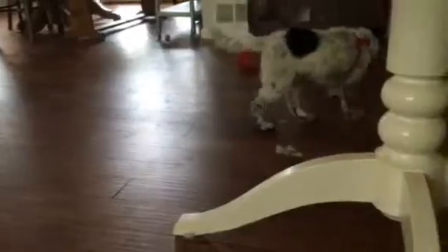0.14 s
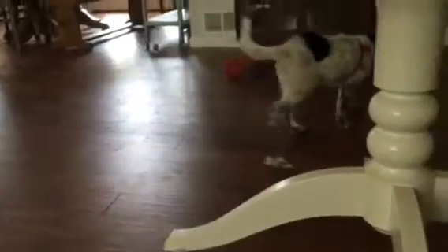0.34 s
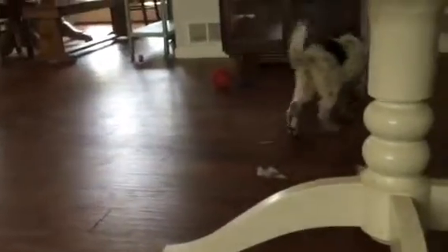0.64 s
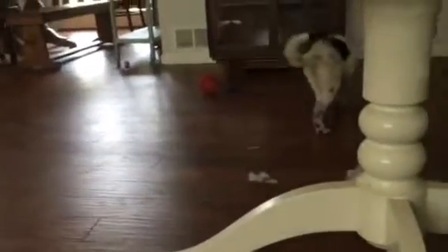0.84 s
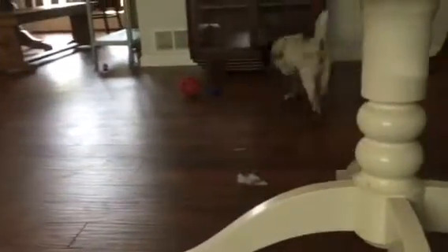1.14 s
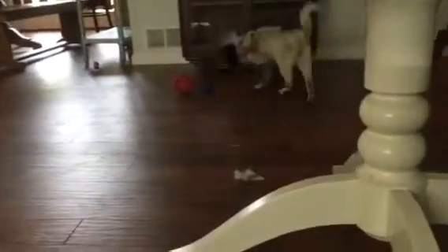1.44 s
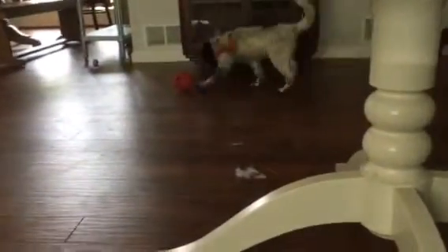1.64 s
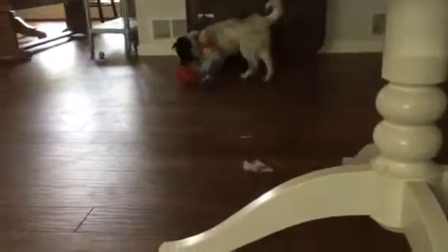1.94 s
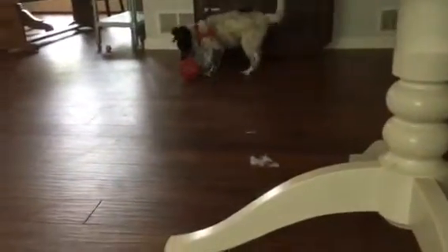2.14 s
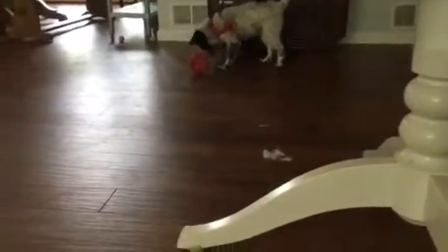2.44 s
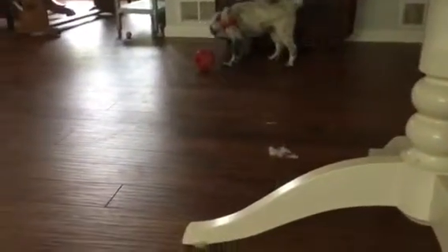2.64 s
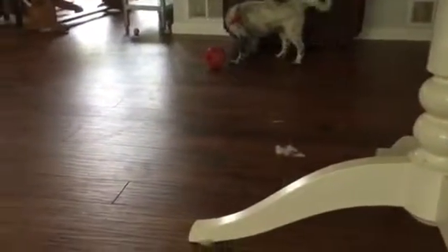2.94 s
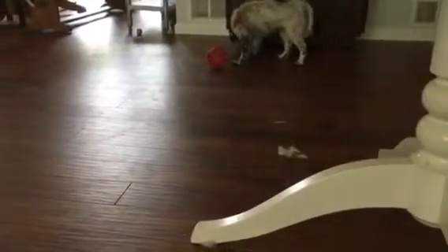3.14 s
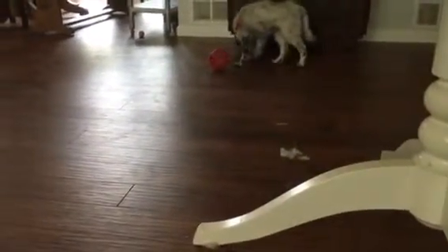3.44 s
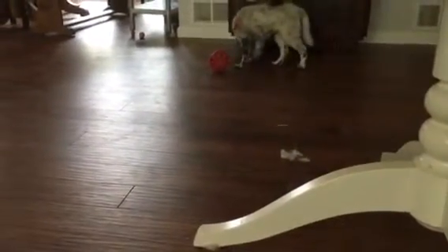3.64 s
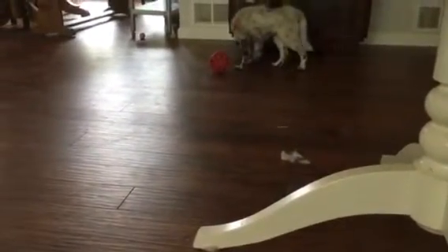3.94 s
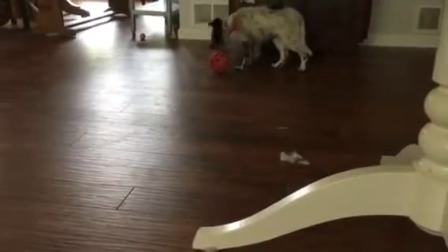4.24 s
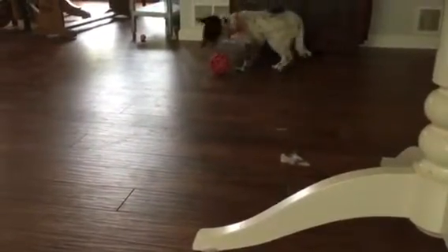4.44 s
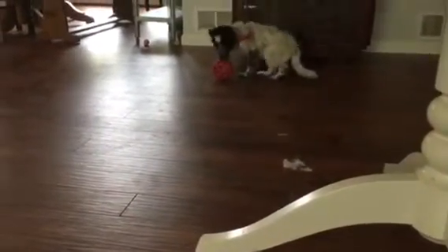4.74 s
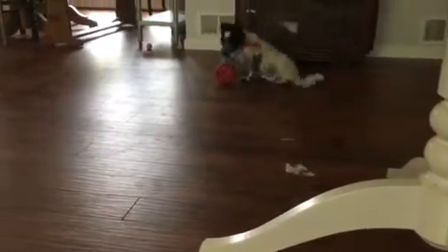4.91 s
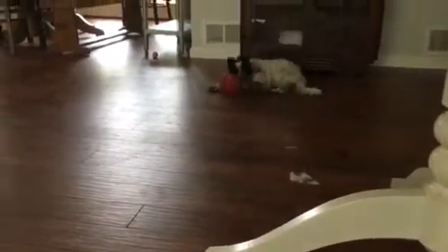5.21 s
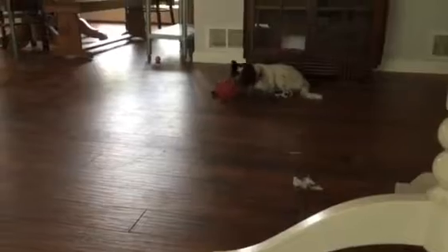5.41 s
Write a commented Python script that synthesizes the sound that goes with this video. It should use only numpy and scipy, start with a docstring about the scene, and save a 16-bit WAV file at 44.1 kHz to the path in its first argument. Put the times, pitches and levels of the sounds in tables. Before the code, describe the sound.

A puppy trots over hardwood with faint claw ticks and soft paw thuds, then bats a hard hollow plastic toy, which cracks and clatters loudly around two seconds. A quieter stretch has tiny nips and rubs. It skids a nail, flops down and knocks the toy again. Bare, reverberant room; microphone some distance away, with low air noise and hum.

```python
"""Soft air noise and a faint rumble last throughout, with an appliance hum that rises over 2.2 s (noise, sine).
A puppy trots over hardwood: claws tick (short noise bursts), paws thud (damped floor and plank modes).
It paws at a hard, hollow plastic toy, which scrapes (random jolts) and clatters (cracks, shell resonances).
It nuzzles and nips the toy, skids a nail and flops down on it; decaying noise gives the bare room's echoes."""
import sys
import numpy as np
from scipy import signal
from scipy.fft import rfft, irfft, next_fast_len
from scipy.io import wavfile
from scipy.ndimage import map_coordinates

SR = 44100
rng = np.random.default_rng(int(sys.argv[2]) if len(sys.argv) > 2 else 0)


def persist_wave(psi):
    """Save psi, clipped to +-1, as 16-bit WAV."""
    counts = np.round(np.clip(psi, -1, 1) * 32767).astype(np.int16)
    wavfile.write(sys.argv[1], SR, np.atleast_2d(counts).T)


N = 245637
T = np.arange(int(0.6 * SR)) / SR  # s, one event
CLOCK = np.arange(N) / SR  # s, whole scene


def amp(db):
    """Decibels to amplitude gain."""
    return 10 ** (np.asarray(db) / 20)


def fade(t60_s):
    """Exponential decay: 60 dB lost in t60_s."""
    return np.exp(-np.log(1000) * T / t60_s)


def unit(x, size=None):
    """x scaled to rms 1 over its first size samples."""
    return x / np.sqrt(np.mean(x[:size] ** 2) + 1e-20)


def crest(x):
    """x scaled to peak 1."""
    return x / np.abs(x).max()


def along(points, hz):
    """(f/Hz, value) points interpolated on a log-frequency axis."""
    f, v = np.transpose(points)
    return np.interp(np.log(hz + 1), np.log(f + 1), v)


def wobble(rate_hz, size=N):
    """Smooth random curve with rate_hz knots a second."""
    knots = rng.standard_normal(int(size * rate_hz / SR) + 4)
    return map_coordinates(knots, [CLOCK[:size] * rate_hz])


def colour(x, spectrum, size=2048):
    """x through a minimum-phase filter with the given (f/Hz, gain/dB)."""
    gain_db = along(spectrum, np.fft.rfftfreq(size, 1 / SR))
    cepstrum = irfft(np.log(amp(gain_db)))
    cepstrum[1:size // 2] *= 2  # fold to make it causal
    cepstrum[size // 2 + 1:] = 0
    impulse = irfft(np.exp(rfft(cepstrum)))
    return signal.fftconvolve(x, impulse)[:len(x)]


def resonate(x, peaks):
    """x through parallel damped resonances (f/Hz, width/Hz, level/dB), at random phases."""
    t = T[:4096]
    impulse = np.zeros(len(t))
    for hz, width_hz, db in peaks:
        decay = np.exp(-np.pi * width_hz * t)
        impulse += amp(db) * width_hz * decay * np.sin(2 * np.pi * (hz * t + rng.random()))
    return signal.fftconvolve(x, impulse)[:len(x)]


def ring(modes, scatter_db):
    """Damped modes (f/Hz, level/dB, t60/s), each struck at a random strength and phase."""
    gains = amp(rng.normal(0, scatter_db, len(modes)))
    out = np.zeros(len(T))
    for gain, (hz, db, t60_s) in zip(gains, modes):
        out += gain * amp(db) * fade(t60_s) * np.sin(2 * np.pi * (hz * T + rng.random()))
    return out


def add(track, s, sound):
    """Mix a sound into the track at s seconds."""
    room_left = track[max(round(s * SR), 0):][:len(sound)]
    room_left += sound[:len(room_left)]


def strokes(rows, attack_s, release_s, swell_db=0):
    """Gain of (t/s, length/s, level/dB) strokes: linear attack, swell to level, exponential release."""
    gain = np.zeros(N)
    for s, length_s, db in rows:
        t = CLOCK - s
        to_go = 1 - np.clip(t / length_s, 0, 1)
        attack = np.clip(t / attack_s, 0, 1)
        release = np.exp(-np.maximum(t - length_s, 0) / release_s)
        gain += amp(db - swell_db * to_go) * attack * release
    return gain


# Diffuse room decay: f/Hz, t60/s
ROOM_DECAY = [(150, 0.79), (700, 0.53), (2000, 0.72), (5000, 0.65), (9000, 0.48), (14000, 0.33)]


def echoes(early_db=2, early_t60=0.17, spiky=0.69):
    """Room answer: uneven, spiky early reflections plus a diffuse tail whose top treble dies soonest."""
    hz, t, z = signal.stft(rng.standard_normal(len(T)), SR, nperseg=256)
    decay = np.exp(-np.log(1000) * t / along(ROOM_DECAY, hz)[:, None])
    tail = signal.istft(z * decay, SR, nperseg=256)[1][:len(T)]
    spikes = rng.standard_normal(len(T)) * np.exp(spiky * rng.standard_normal(len(T)))
    return tail + amp(early_db) * unit(spikes) * fade(early_t60)


def crack(spectrum, t60):
    """Direct sound of a hard contact: impulse plus decaying noise, filtered, peak 1."""
    burst = 0.89 * rng.standard_normal(len(T)) * fade(t60)
    return crest(colour((T == 0) + burst, spectrum))


# Knock tone bands: lower f/Hz, upper f/Hz
TONE_BANDS = [(400, 1500), (1500, 4500), (4500, 7000), (7000, 9800), (9800, 15900)]


def balance(x, levels_db, size=1024):
    """(f/Hz, gain/dB) filter points that steer the start of x to the given band levels."""
    hz = np.fft.rfftfreq(size, 1 / SR)
    power = 2 * np.abs(rfft(x[:size]) / size) ** 2
    points = []
    for (lo, hi), db in zip(TONE_BANDS, levels_db):
        change_db = db - 10 * np.log10(power[(hz >= lo) & (hz < hi)].sum())
        points += [(lo * 1.1, change_db), (hi / 1.1, change_db)]
    return points


AIR_DB = -62  # mean level, rms
HUM_DB, HUM_RISE_S = -63.5, 2.2  # rms level once risen; linear rise
# Air noise spectrum: f/Hz, level/dB
AIR_SPECTRUM = [(59, -33), (100, -7.5), (210, -4.5), (238, -1), (265, -6.5), (301, -1), (405, -11.5),
                (469, -13), (687, -14), (849, -15.5), (1100, -17), (1440, -13.5), (4930, -32),
                (6220, -33.5), (15800, -43.5)]


def background(rumble_db=-68, hum_hz=59.0):
    """Filtered air noise and rumble, plus a sine hum wavering in phase and level."""
    air = unit(colour(rng.standard_normal(N), AIR_SPECTRUM, size=8192))
    air = air * amp(AIR_DB + 0.36 * wobble(9.8))
    rumble_spectrum = [(20, -24.5), (42, -12), (65, 1), (110, -6.0), (200, -36.5), (800, -67.5)]
    rumble = unit(colour(rng.standard_normal(N), rumble_spectrum, size=8192))
    hum = np.sqrt(2) * np.sin(2 * np.pi * hum_hz * CLOCK + 0.34 * wobble(2.7))
    hum *= np.minimum(CLOCK / HUM_RISE_S, 1)
    return air + amp(rumble_db) * rumble + hum * amp(HUM_DB + 1.4 * wobble(7.7))


# Small dry tap at the microphone: t/s, click peak level/dB
MIC_TAPS = [(3.062, -38.5)]


def taps(bump_db=-9, bump_hz=130):
    """A click too close to echo, with a small, decaying low bump."""
    out = np.zeros(N)
    spectrum = [(200, -5), (1600, 4.5), (3200, -5.5), (5000, -1), (9000, -18), (15000, -21)]
    for s, db in MIC_TAPS:
        click = crack(spectrum, t60=0.0015)
        bump = fade(0.048) * np.sin(2 * np.pi * bump_hz * T)
        add(out, s, amp(db) * (click + amp(bump_db) * bump))
    return out


# Paw skims the boards: t/s, length/s, level/dB
PAW_SWISHES = [(0.165, .05, -68)]


def swish(attack_s=0.025, release_s=0.099):
    """A dry pad brushes the varnish: a thin noise hiss."""
    spectrum = [(1000, -6), (4000, 5), (9000, -1.5), (15800, -7)]
    hiss = unit(colour(rng.standard_normal(N), spectrum))
    return hiss * strokes(PAW_SWISHES, attack_s, release_s)


# Nail catches and skids as the puppy crouches: t/s, level/dB
NAIL_SKIDS = [(4.479, -63.5), (4.493, -60)]
# Skid resonances: f/Hz, width/Hz, level/dB
SKID_MODES = [(3640, 580, 1), (5440, 1100, -5), (6800, 1100, -8.5), (8580, 510, -11), (11000, 2100, -21)]


def skids(early_db=5, early_t60=0.077):
    """A skidding nail excites damped resonances: a short, ringing scuff."""
    out = np.zeros(N)
    for s, db in NAIL_SKIDS:
        scuff = unit(resonate(echoes(early_db, early_t60), SKID_MODES), size=1000)
        add(out, s, amp(db) * scuff)
    return out


TROT_END_S = 1.6  # other nails graze the floor until then
GRAZE_TICK_DB, GRAZE_RING_DB = -56, -68.5  # before the trims
# Claws touch the boards: t/s, tick peak level/dB, ring level/dB (both before the trims)
CLAW_TICKS = [(0.064, -62, -62.5), (0.434, -45.5, -71), (0.579, -60, -67), (0.752, -47, -67),
              (0.778, -54, -58), (1.235, -63, -66.5), (1.397, -60, -64), (1.434, -46, -53),
              (3.349, -64, -71.5), (4.62, -55, -69)]
# Nail-on-board spectrum: f/Hz, level/dB
NAIL_SPECTRUM = [(500, -15.5), (1400, -5.5), (2400, -3), (3500, -1), (4800, -2.5), (6200, -2), (7600, -13),
                 (8700, -4.5), (10300, -17.5), (12000, -12.5), (15800, -24)]


def claws(ring_trim_db=-3, tick_trim_db=-4, count=9):
    """Thin, bright nail ticks with room echoes, plus randomly timed grazes during the trot."""
    out = np.zeros(N)
    grazes = []
    for k in range(count):
        graze_s = TROT_END_S * (k + rng.random()) / count
        grazes.append((graze_s, GRAZE_TICK_DB, GRAZE_RING_DB))
    for s, tick_db, ring_db in CLAW_TICKS + grazes:
        answer = unit(colour(echoes(early_db=1.5, early_t60=0.076), NAIL_SPECTRUM), size=1000)
        tick = crack(NAIL_SPECTRUM, t60=0.006)
        add(out, s, amp(ring_db + ring_trim_db) * answer + amp(tick_db + tick_trim_db) * tick)
    return out


# Paws, body and toy load the floor: t/s, deep thud level/dB, plank knock level/dB (before the trims)
FLOOR_THUDS = [(0.096, -47, -52.5), (0.463, -50, -62), (0.806, -39, -54), (0.844, -40.5, -56),
               (1.124, -43.5, -56), (1.447, -37, -42), (1.488, -45, -56), (1.811, -46, -35),
               (1.886, -36, -59), (1.946, -40, -45), (2.015, -41, -39.5), (2.555, -60, -40.5),
               (5.07, -36.5, -41), (5.25, -35, -32), (5.31, -42, -45)]
# Deep floor bending modes: f/Hz, level/dB, t60/s
JOIST_MODES = [(62.4, -1, 0.16), (77.3, -3, 0.37), (103.5, -0.5, 0.24)]
# Single plank modes: f/Hz, level/dB, t60/s
PLANK_MODES = [(152.6, -1, 0.092), (213.3, 2.5, 0.13), (243.5, 1.5, 0.089), (312.4, -7, 0.127)]


def thuds(deep_trim_db=-2.0, plank_trim_db=1.0, room_db=-13):
    """Soft weight bends the whole floor; harder landings knock the planks, which the room echoes."""
    out = np.zeros(N)
    swell = 1 - np.exp(-(T / 0.008) ** 2)  # soft pads spread the blow over several ms
    boom_spectrum = [(70, -10.5), (220, -0.5), (330, -4.5), (450, -12.0), (1200, -58)]
    for s, deep_db, plank_db in FLOOR_THUDS:
        boom = crest(colour(echoes(), boom_spectrum))
        plank_ring = ring(PLANK_MODES, scatter_db=2.5) / len(PLANK_MODES)
        planks = crest(swell * (plank_ring + amp(room_db) * boom))
        joists = crest(swell * ring(JOIST_MODES, scatter_db=3.5))
        add(out, s, amp(deep_db + deep_trim_db) * joists + amp(plank_db + plank_trim_db) * planks)
    # the floor radiates little deep bass
    return signal.sosfilt(signal.butter(2, 45, 'highpass', fs=SR, output='sos'), out)


# Muzzle rubs on the toy: t/s, length/s, level/dB
MUZZLE_RUBS = [(3.35, 0.046, -66), (3.52, 0.13, -68.5), (3.77, 0.11, -66.5)]


def nuzzle(attack_s=0.028, release_s=0.046):
    """Nose and fur rub the hollow shell: noise through damped resonances."""
    peaks = [(1150, 510, -7), (1640, 65, -3.5), (1880, 110, -0.5), (2110, 160, -5.0)]
    rub = unit(resonate(rng.standard_normal(N), peaks))
    return rub * strokes(MUZZLE_RUBS, attack_s, release_s)


# Teeth nip the still toy: t/s, level/dB
TOOTH_NIPS = [(3.511, -67), (3.614, -61), (3.713, -61)]
# Nipped rim resonances: f/Hz, width/Hz, level/dB
RIM_MODES = [(1210, 880, -3.5), (1690, 170, 0), (2200, 150, 4.5), (2880, 510, -7.5), (3690, 280, 1),
             (6100, 1100, -16), (8500, 420, -5), (11700, 1800, -19)]


def nips(snap=30):
    """A tooth slips off the rim, whose damped resonances ring briefly."""
    out = np.zeros(N)
    for s, db in TOOTH_NIPS:
        bite = snap * (T == 0) + echoes(early_db=11, early_t60=0.035)
        add(out, s, amp(db) * unit(resonate(bite, RIM_MODES), size=1000))
    return out


PUSH_ATTACK_S, PUSH_RELEASE_S = 0.02, 0.0144  # friction stops the toy
PUSH_SWELL_DB = 3  # the toy gathers speed during a push
# Pushes slide the toy over the boards: t/s, length/s, level/dB at the end
TOY_PUSHES = [(1.722, 0.078, -46.5), (1.87, 0.13, -50.5), (2.2, 0.21, -63), (2.456, 0.12, -49.5),
              (2.548, 0.049, -44.5), (4.918, 0.099, -61.5), (5.07, .05, -45), (5.17, 0.15, -52.5),
              (5.39, 0.047, -47.5), (5.535, 0.039, -54)]
# Scrape spectrum: f/Hz, level/dB
SCRAPE_SPECTRUM = [(200, -10.5), (500, -8.5), (1300, -4.5), (2200, -1), (3700, -7), (5000, -12), (6300, -5),
                   (7500, -15.5), (9100, -10.5), (10300, -23), (12500, -20), (15800, -31.5)]


def toy_slide(catches_per_s=1100, spread_db=3):
    """The sliding shell catches on the wood grain in many tiny, uneven jolts."""
    jolts = (rng.random(N) < catches_per_s / SR) * rng.choice([-1, 1], N)
    jolts = jolts * amp(spread_db * rng.standard_normal(N))
    path = colour(echoes() + 20 * (T == 0), SCRAPE_SPECTRUM)
    speed = strokes(TOY_PUSHES, PUSH_ATTACK_S, PUSH_RELEASE_S, PUSH_SWELL_DB)
    return signal.fftconvolve(unit(jolts) * speed, path / np.linalg.norm(path))[:N]


CRACK_T60_S = 0.007
REBOUND_S, REBOUND_DB = 0.0095, -10.5  # second, weaker touch after each knock
SOFTNESS_ORDER = 5.1  # steepness of treble loss above the corner
# Toy strikes the floor: t/s, crack peak level/dB, ring level/dB (both before the trims),
# softness corner f/Hz
TOY_KNOCKS = [(1.7409, -46, -54, 9000), (1.796, -27.5, -34.5, 3330), (1.9256, -33, -45.5, 5130),
              (1.962, -17, -31.5, 3010), (2.0104, -9.5, -26.5, 4860), (2.0322, -31, -43.5, 10000),
              (2.0578, -28.5, -41.5, 3460), (2.5379, -30, -48.5, 4180), (2.556, -22.5, -41, 11000),
              (5.0601, -38, -52, 8100), (5.082, -39, -50, 9000), (5.117, -33.5, -50, 5000),
              (5.2128, -36, -58, 9900), (5.235, -27, -38, 4100), (5.267, -44, -44, 12000),
              (5.2801, -19.5, -39.5, 4300), (5.3826, -30, -43.5, 7300)]
# Shell resonances: f/Hz, width/Hz, level/dB
SHELL_MODES = [(1005, 34, -2), (1602, 11, -10.5), (2040, 280, -2), (2290, 51, 0.5), (2717, 54, -2),
               (2920, 190, -6.5), (3340, 16, 1), (3500, 360, 1), (4170, 59, -4.5), (4560, 220, -1),
               (5295, 90, 2.5), (5964, 79, -11), (6700, 44, -28), (9300, 48, -22)]
# Plastic-on-wood spectrum: f/Hz, level/dB
PLASTIC_SPECTRUM = [(200, -37), (450, -22.5), (620, -11), (1000, -11.5), (1250, -13), (2100, -3),
                    (2900, -4), (3700, -3.5), (4950, -9.5), (5600, -2), (6600, -8), (7400, -19.5),
                    (9200, -13.5), (10300, -33), (15800, -41)]
# Hardest contact, one value per tone band: level/dB
HARD_TONE_DB = [-10, 0, -3, -5.5, -4]


def toy_knocks(shell_db=0, ring_trim_db=-1, crack_trim_db=-2, chatter_db=3.0):
    """Each knock is a crack and a rebound, its shell ring filling the room; harder spots sound brighter."""
    out = np.zeros(N)
    centres_hz = np.sqrt(np.prod(TONE_BANDS, axis=1))
    for s, crack_db, ring_db, corner_hz in TOY_KNOCKS:
        tone_db = HARD_TONE_DB - 10 * np.log10(1 + (centres_hz / corner_hz) ** SOFTNESS_ORDER)
        for delay_s, loss_db in ((0, 0), (REBOUND_S, REBOUND_DB)):
            # small rattles roughen the decay
            chatter = amp(chatter_db * wobble(167, size=len(T)) * fade(0.75))
            clatter = unit(colour(chatter * echoes(spiky=0.545), PLASTIC_SPECTRUM), size=1300)
            shell = unit(resonate(chatter * echoes(), SHELL_MODES), size=1300)
            body = clatter + amp(shell_db) * shell
            spot = balance(body, tone_db)
            direct = crest(colour(crack(PLASTIC_SPECTRUM, CRACK_T60_S), spot))
            knock = amp(ring_db + ring_trim_db) * colour(body, spot)
            knock = knock + amp(crack_db + crack_trim_db) * direct
            add(out, s + delay_s, amp(loss_db) * knock)
    return out


def scene():
    """Sum of all sources at one microphone."""
    toy = toy_knocks() + toy_slide() + nips() + nuzzle()
    paws = claws() + skids() + swish() + thuds()
    return (toy + paws + taps() + background())[None]


TOP_HZ = 15850


def record(dry):
    """The recorder keeps nothing above its band limit: a brick-wall low-pass."""
    size = next_fast_len(N + SR)
    passband = np.fft.rfftfreq(size, 1 / SR) < TOP_HZ
    return irfft(rfft(dry, size) * passband, size)[:, :N]


dry = scene()
out = record(dry)
persist_wave(out)
```